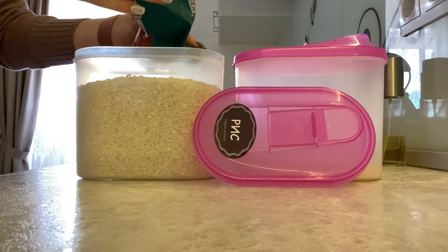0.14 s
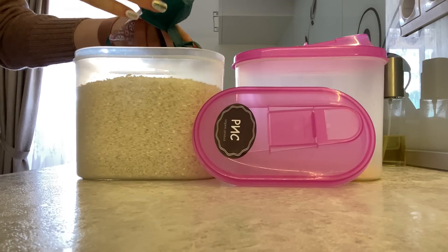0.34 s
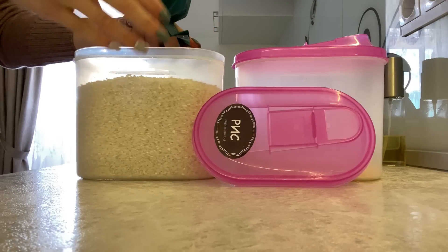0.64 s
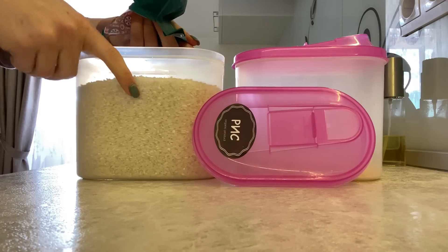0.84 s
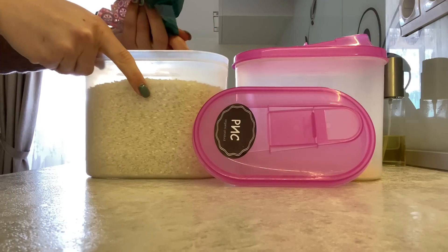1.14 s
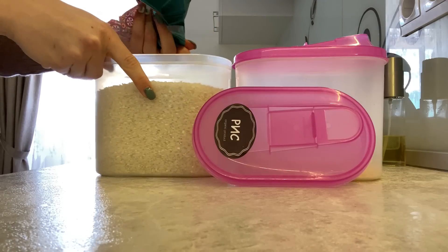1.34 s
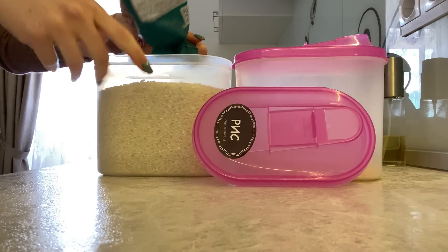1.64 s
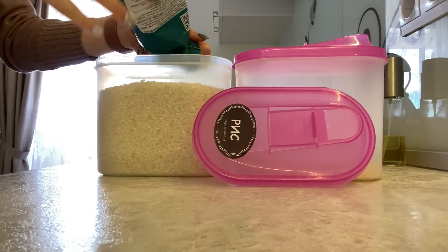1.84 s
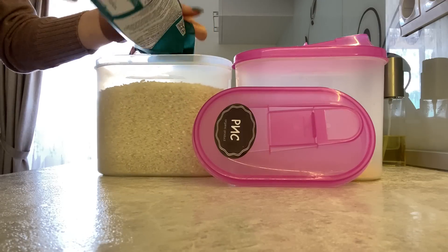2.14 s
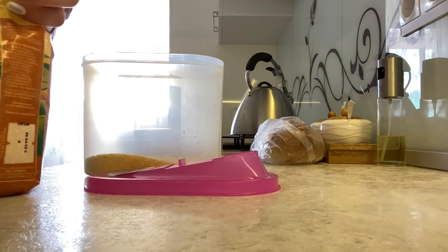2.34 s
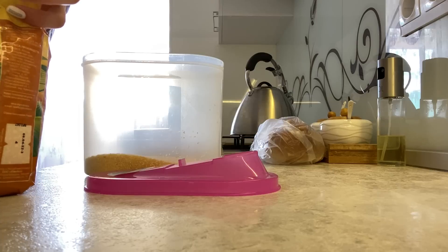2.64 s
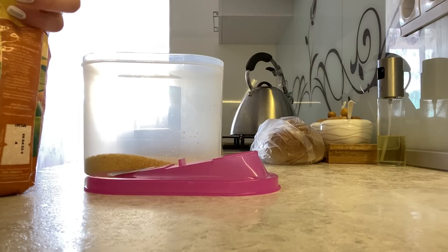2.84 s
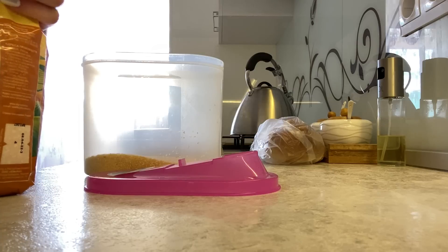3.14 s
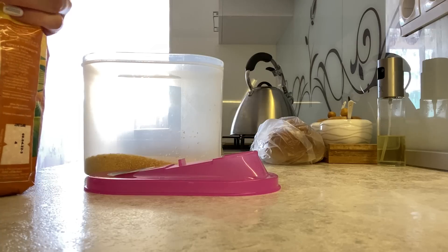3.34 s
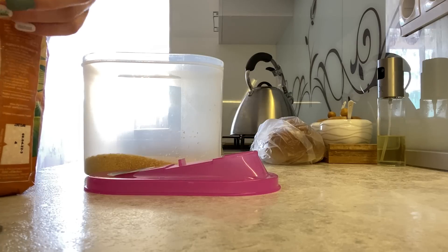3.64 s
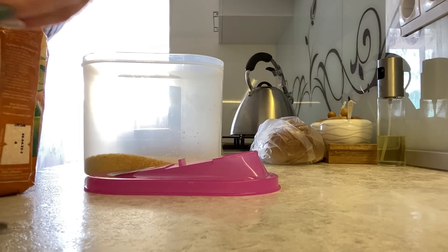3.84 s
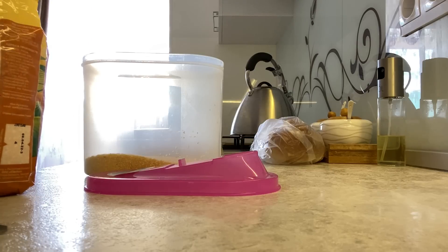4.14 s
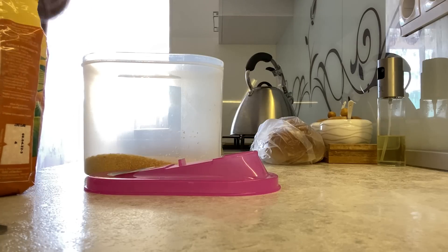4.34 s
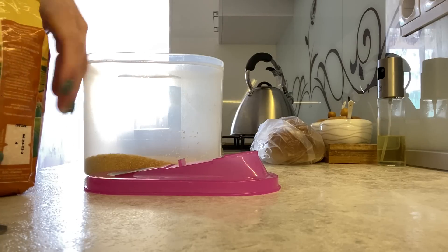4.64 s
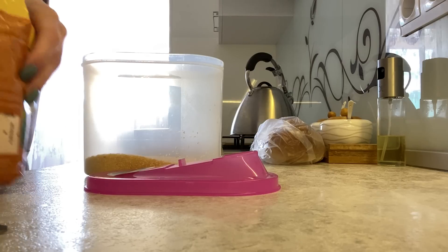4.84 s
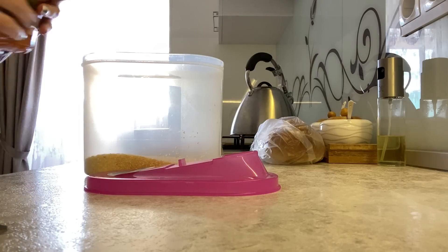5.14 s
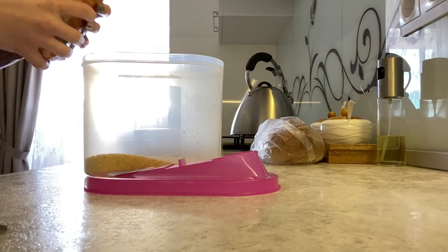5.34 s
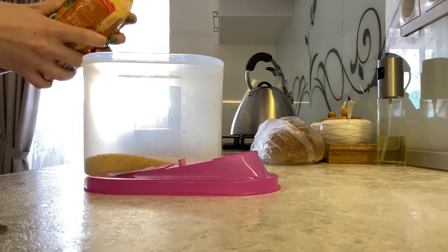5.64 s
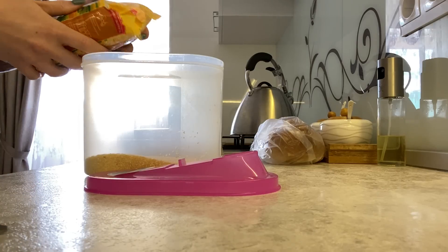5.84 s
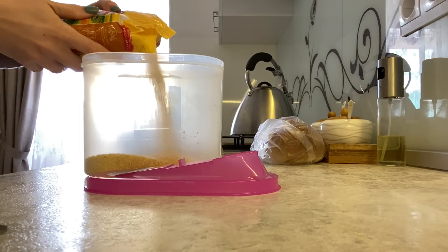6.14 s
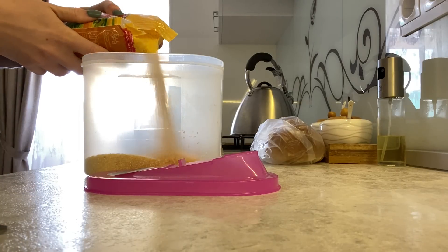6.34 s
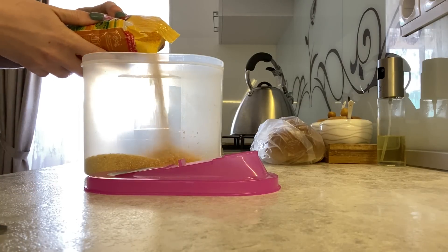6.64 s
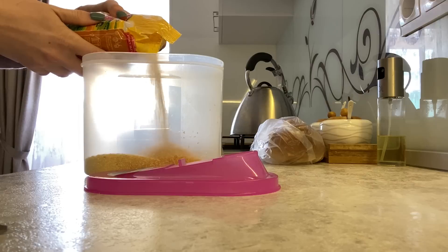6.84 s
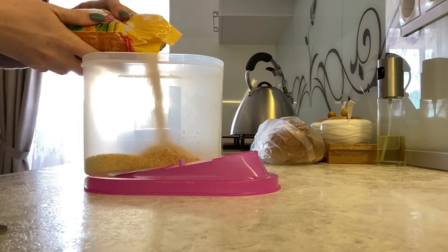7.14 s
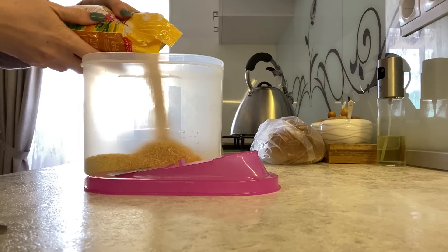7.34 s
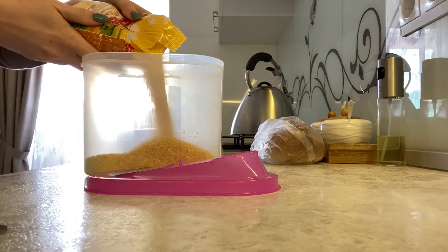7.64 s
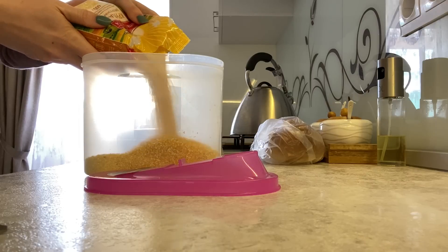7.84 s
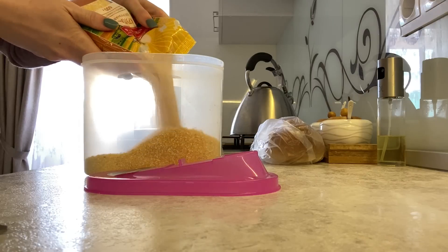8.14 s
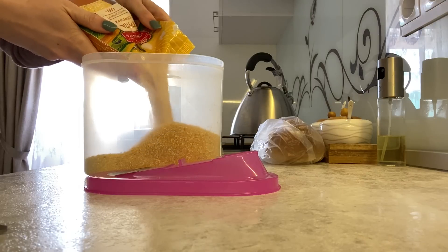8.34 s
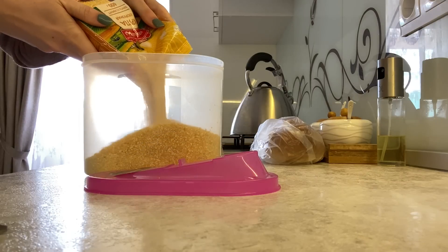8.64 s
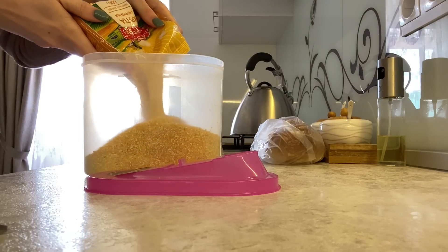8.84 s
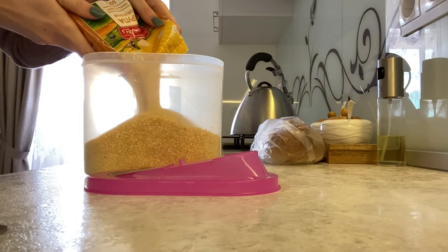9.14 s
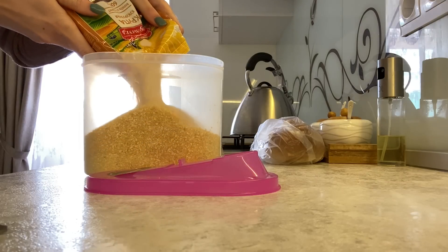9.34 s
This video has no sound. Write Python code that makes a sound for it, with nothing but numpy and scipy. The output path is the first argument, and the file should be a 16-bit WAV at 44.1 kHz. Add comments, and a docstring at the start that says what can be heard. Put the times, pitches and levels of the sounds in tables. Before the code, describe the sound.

Close on a kitchen counter, a nearly empty plastic bag crackles as it is shaken out. A finger rumbles softly through rice and a nail chirps on the tub. A stiff packet snaps and pops open, bumps down with hollow knocks, and is lifted with lighter crinkles. Fine grain then drums into a plastic tub, growing into a dense hiss in a small, lightly reverberant room.

```python
"""A plastic rice bag is shaken out close by on a kitchen counter, over still air and a faint mains hum.
A finger sweeps through the rice, and its nail makes the tub chirp.
A stiff packet is pulled open with snapping creases and popping glue, knocked down, then lifted.
At last fine grain streams into a plastic tub: many tiny impacts drum on the walls and swell to a hiss.
Creases are bursts of noise sent through resonances; rubbing and air are noise given a colour."""
import sys
import numpy as np
from scipy import signal
from scipy.fft import rfft, irfft
from scipy.io import wavfile

SR = 44100
rng = np.random.default_rng(int(sys.argv[2]) if len(sys.argv) > 2 else 0)


def digitize_waveform(pressure):
    """Quantize a signal to 16-bit integers and store it at the path in sys.argv[1].

    Rows of a 2-D input are taken as channels; values are limited to [-1, 1].
    """
    field = np.atleast_2d(pressure).T
    bounded = np.clip(field, -1, 1)
    quanta = np.round(bounded * 32767).astype(np.int16)
    wavfile.write(sys.argv[1], SR, quanta)


N = 418068
TIME = np.arange(N) / SR   # seconds

# Level columns in dB are starting points where scene() adds a trim to them.

# Colour of the background noise. Each row: frequency in Hz, relative level in dB.
AIR = [(30, -13), (65, -4.5), (350, -10), (900, -9), (2000, -20.5), (15000, -33.5)]
AIR_DB = -53.5   # before the trim in scene()
EARLY_AIR_DB = -2.5   # the background noise is this much lower before PACKET_TAKEN_S
# Mains hum. Each row: frequency in Hz, level in dB.
HUM = [(99, -55)]

# Creases giving way in the packets; the rows at 1.822 and 2.012 s are the slack bag knocking against the tub,
# played the same way. Each row: start in seconds, panel level in dB, crack level in dB, tick level in dB.
CREASE_SNAPS = [(0.002,-22,-37,-55), (0.049,-24.5,-34,-62), (0.134,-16,-25,-31), (0.17,-15,-31,-44),
                (0.262,-25.5,-39,-58), (0.327,-40,-44,-40), (0.388,-35,-47,-36), (0.419,-36.5,-42,-41),
                (0.5,-29,-39,-58), (0.524,-21.5,-49,-57), (0.538,-21.5,-27.5,-43), (0.632,-43,-40,-29),
                (0.675,-52,-52,-32.5), (0.686,-47,-44,-39), (0.8975,-30.5,-34.5,-29.5),
                (1.822,-17.5,-30,-32.5), (2.012,-17.5,-33.5,-41.5), (2.249,-30,-9.5,-11.5),
                (2.261,-13,-16,-17), (2.294,-17.5,-9,-5), (2.304,-6.5,-11,-10), (2.403,-37,-31,-27.5),
                (2.432,-39,-22.5,-21.5), (2.512,-29,-30,-25), (2.539,-21,-24,-28), (2.558,-18,-22.5,-29),
                (2.598,-22,-23.5,-30), (2.667,-6,-11.5,-9.5), (2.822,-49,-47,-26), (2.85,-44,-28.5,-24.5),
                (2.882,-24,-33,-24.5), (2.9,-15.5,-26.5,-22), (2.939,-20,-18.5,-18.5), (2.96,-26,-22,-17),
                (3.05,-25.5,-33,-29), (3.158,-27,-33,-24.5), (3.3143,-34.5,-42.5,-35), (3.456,-35,-41,-51),
                (3.57,-27.5,-22.5,-16), (3.644,-13.5,-15,-23.5), (3.7981,-9.5,-10,-21),
                (3.896,-1.5,-8.5,-21), (3.9419,-10.5,-20,-27), (4.157,-37.5,-40.5,-36.5),
                (4.2374,-33,-25.5,-30), (4.3383,-30,-30,-18), (4.389,-27,-30,-31.5), (4.409,-41,-32.5,-37),
                (4.8247,-26.5,-38.5,-51.5), (4.877,-35.5,-43,-49), (4.944,-29.5,-56,-60),
                (5.013,-26.5,-38.5,-46), (5.046,-42,-44,-37), (5.052,-22,-31.5,-35), (5.255,-31,-42,-39),
                (5.486,-30.5,-27,-33), (5.528,-21,-31,-38.5), (5.616,-34,-33.5,-58),
                (5.656,-28.5,-38,-40.5), (5.757,-32,-35,-52), (5.869,-26,-47,-39), (6.016,-50,-32,-55),
                (6.073,-30.5,-42,-40.5), (6.287,-31,-44,-44), (6.4219,-21,-28.5,-22.5),
                (7.112,-31.5,-33.5,-39.5), (7.149,-29.5,-29.5,-52), (7.303,-31.5,-42,-48),
                (7.41,-30.5,-34.5,-48), (7.466,-28.5,-31,-39.5), (7.675,-23,-32,-27.5),
                (7.748,-28.5,-50,-48), (8.083,-21,-33.5,-43), (8.184,-25.5,-30.5,-26), (8.362,-20,-32,-31),
                (8.502,-25.5,-33,-34), (8.579,-26.5,-27.5,-31), (8.834,-26,-23,-28), (8.984,-25,-48,-41),
                (9.17,-34.5,-58,-50), (9.271,-22.5,-31,-36), (9.437,-24,-25.5,-22)]
# Resonances of a packet's panels. Each row: frequency in Hz before tension, width in Hz, relative level in dB.
PANEL_MODES = [(360, 37, -5), (546, 93, -3), (810, 500, 0.5), (982, 210, 6), (1233, 600, -2.5)]
BAG_SHAKEN_S, PACKET_TAKEN_S, PACKET_LIFTED_S = 1, 2.2, 4.7   # when each stage ends or begins
# Tension multiplies the panel pitch; the weight of the grain pulls the lifted packet taut.
LIMP_TENSION = 0.91   # the nearly empty rice bag
EMPTY_TENSION = 0.68   # the same bag, emptied and slack
LIFTED_TENSION = 1.09
FOLD_OCTAVES_PER_DB, USUAL_FOLD_DB = 0.007, -16   # bigger folds ring lower
LIMP_TICK_HZ, STIFF_TICK_HZ = 14000, 6390   # thin film shaken loose ticks higher than firmly held film
TICK_HIGH_HZ = 14500
LOOSE_SHIVER, LIFTED_SHIVER = 0.12, 0.21   # a packet hanging in the hands crumples on after each snap
SHIVERING_FOLD_DB = -23   # until the packet is lifted, folds smaller than this shiver less

# The hands squeeze or shift a packet.
# Each row: start in seconds, length in seconds, panel rustle level in dB, crinkle level in dB.
SQUEEZES = [(0,0.059,-26,-42), (.123,0.054,-24.5,-36), (.25,0.11,-38.5,-49), (.49,0.072,-31.5,-38.5),
            (.67,0.058,-54,-47), (1.49,0.034,-46,-54.5), (1.71,0.16,-42,-66), (1.93,0.18,-49.5,-58.5),
            (2.1,0.078,-39,-55), (2.21,.13,-23.5,-35), (2.39,0.07,-25,-29.5), (2.495,0.061,-17,-29),
            (2.625,0.05,-24.5,-30.5), (2.79,0.072,-32.5,-37.5), (2.88,0.091,-22.5,-31.5),
            (3.02,0.18,-38.5,-39), (3.2,0.75,-49.5,-59.5), (3.65,0.22,-37.5,-47), (3.885,0.074,-13,-44),
            (4.38,0.07,-50,-47), (4.69,0.29,-46,-49), (4.765,0.13,-44.5,-44.5), (5.03,0.13,-38,-41),
            (5.22,0.34,-52,-47.5), (5.49,0.41,-46,-47.5)]
SQUEEZE_ATTACK_S, SQUEEZE_RELEASE_S = 0.0016, 0.026
EASE_IN_SHARE = 0.047   # every movement's attack grows by this share of its length
# Colour of rustling panels. Each row: frequency in Hz, relative level in dB.
RUSTLE = [(150, -18), (320, -7), (420, -7), (580, -2), (1050, -6), (1500, -9), (4500, -29)]
# Colour of crinkling film. Each row: frequency in Hz, relative level in dB.
CRINKLE = [(900, -4.5), (2000, 2), (4400, 0), (7000, -0.5), (11500, -10), (16000, -6)]

# A packet is jolted and its grain settles.
# Each row: start in seconds, length in seconds, rumble level in dB.
BUMPS = [(0,0.011,-44.5), (.13,0.019,-46), (3.645,0.022,-36.5), (3.8,0.037,-34.5), (3.89,0.039,-25.5)]
BUMP_ATTACK_S, BUMP_RELEASE_S = 0.0047, 0.066
# The finger sweeps through the rice.
# Each row: start in seconds, length in seconds, rumble level in dB.
SWEEPS = [(1.09,0.2,-34), (1.34,0.064,-36.5)]
SWEEP_ATTACK_S, SWEEP_RELEASE_S = 0.1, 0.055
SWEEP_RUB_DB, SWEEP_HISS_DB = -15, -16.5   # relative to the rumble
# Colour of rumbling grain. Each row: frequency in Hz, relative level in dB.
RUMBLE = [(30, -23), (110, -24), (150, 3.5), (200, 0), (250, -12.5), (450, -9.5)]

# Tones of the air in the open tubs. Each row: frequency in Hz, relative level in dB.
TUB_AIR = [(320, -13), (582, -1), (720, 0), (952, -5), (1072, -4.5), (1270, -5)]
TUB_AIR_WIDTH_HZ = 22

# A fingernail grazes the tub. Each row: start in seconds, level in dB.
GRAZES = [(1.323,-35), (1.3395,-26.5)]
# Resonances of the wall under the nail. Each row: frequency in Hz, width in Hz, relative level in dB.
WALL_MODES = [(746, 740, 7.5), (3520, 370, 7.5), (6650, 1900, -4)]

# The glued seam of the stiff packet pops open. Each row: start in seconds, level in dB.
SEAM_POPS = [(2.243,-25.5), (2.407,-23), (2.424,-22.5), (2.549,-19), (2.6392,-23)]
SEAM_HZ = 7400   # typical pitch

# The full packet bumps down and sets the tubs ringing. Each row: start in seconds, level in dB.
KNOCKS = [(3.644,-13.5), (3.675,-14.5), (3.799,-8.5), (3.897,-3), (3.943,-14), (3.971,-12.5)]
KNOCK_WIDTH_HZ = 28.4   # for the third tub tone; higher tones are wider

# Fingers slide along the film. Each row: start in seconds, length in seconds, level in dB.
SLIDES = [(4.765,0.011,-39), (5.11,0.096,-41.5)]
SLIDE_HZ, SLIDE_WIDTH_HZ = 6200, 4800   # each of two resonances in a row

# The stream of grain. Each row: time in seconds, drumming level in dB, hiss level in dB.
POUR = [(5.65, -41.5, -50), (5.91, -50, -37.5), (6.1, -44.5, -44), (6.34, -39, -46.5), (6.76, -45, -55),
        (7.06, -44.5, -51.5), (7.589, -39.5, -40.5), (8.13, -36, -36.5), (9.17, -35.5, -34.5),
        (9.48, -36, -34.5)]
POUR_ONSET_S = 0.042   # fade-in that ends at the first row
# Resonances of tub and packet under the stream.
# Each row: frequency in Hz, width in Hz, relative level in dB.
TUB_MODES = [(345.4, 38, -0.5), (563, 75, 4.5), (696, 130, 2), (965, 260, 3), (1210, 570, -4.5)]
# Colour of the streaming hiss. Each row: frequency in Hz, relative level in dB.
HISS = [(900,-6), (1800,9), (2900,1.5), (3500,5.5), (5000,4), (7500,4.5), (9700,2), (13000,4), (14500,-1.5)]

# Kitchen reverberation. Each row: frequency in Hz, time to fall by 60 dB in seconds.
KITCHEN = [(500, 0.31), (3000, 0.41), (14000, 0.13)]
WALL_DULLING_HZ = 7500   # the late echoes weaken around and above this
CUTOFF_HZ = 15900


def from_db(db):
    """Turn decibels into a gain."""
    return 10 ** (np.asarray(db) / 20)


def rms_one(x):
    """Scale a sound to an average strength (rms) of 1."""
    return x / np.sqrt(np.mean(x ** 2) + 1e-20)


def at_level(x, db):
    """Scale a short sound to its rms over the first 15 ms."""
    return x * from_db(db) / np.sqrt(np.mean(x[:int(.015 * SR)] ** 2))


def colour(x, points):
    """Shape the spectrum of x along the points, falling away beyond both ends; rms 1."""
    hz, db = np.transpose(points)
    f = np.maximum(np.arange(N // 2 + 1) * SR / N, 1)
    skirts = 1 / (1 + (hz[0] / f / 2) ** 4) / (1 + (f / hz[-1] / 2) ** 4)
    gain = skirts * from_db(np.interp(np.log(f), np.log(hz), db))
    return rms_one(irfft(rfft(x) * gain, N))


def drift(rate):
    """Slow random wandering with rms 1, taking a new direction this many times a second."""
    knots = rng.standard_normal(int(N / SR * rate) + 2)
    return rms_one(np.interp(TIME * rate, np.arange(len(knots)), knots))


def band(x, low_hz, high_hz):
    """Keep what lies between two frequencies."""
    edges = [low_hz, min(high_hz, .45 * SR)]
    return signal.sosfilt(signal.butter(2, edges, "band", fs=SR, output="sos"), x)


def resonate(x, hz, width):
    """Ring at one pitch, with gain 1 at the peak; a narrow width in Hz rings longer."""
    r = np.exp(-np.pi * width / SR)
    feed = np.array([1, 0, -1]) * (1 - r * r) / 2
    return signal.lfilter(feed, [1, -2 * r * np.cos(2 * np.pi * hz / SR), r * r], x)


def grains(per_s, spread_db):
    """Tiny impacts of uneven size at random moments; rms 1."""
    sizes = from_db(spread_db * np.minimum(rng.exponential(1, N), 4)) * rng.choice([-1, 1], N)
    struck = rng.random(N) < per_s / SR
    # a changing rate keeps a steady power
    return rms_one(sizes * struck / np.sqrt(per_s))


def pings(per_s, low_hz, high_hz, cycles):
    """Random tiny impacts, each ringing briefly at one of twelve pitches; rms 1."""
    pitches = np.geomspace(low_hz, high_hz, 12)
    clicks = grains(per_s, spread_db=3)
    dealt = rng.integers(0, len(pitches), N)
    return rms_one(sum(resonate(clicks * (dealt == k) + 1e-18, hz, hz / cycles) / np.sqrt(hz)
                       for k, hz in enumerate(pitches)))


def stroke(start, length, attack_s, release_s):
    """One movement of the hand: it builds up, holds, then dies away."""
    t = TIME - start
    rise = np.clip(t / (attack_s + EASE_IN_SHARE * length), 0, 1)
    return rise * np.exp(-np.clip((t - length) / release_s, 0, 20))


def strokes(rows, attack_s, release_s):
    """A run of movements, added as power: one gain per sample for each dB column."""
    power = sum(np.outer(from_db(db), stroke(start, length, attack_s, release_s)) ** 2
                for start, length, *db in rows)
    return np.sqrt(power)


def background(air_db):
    """Still room air is coloured noise; the hum is a tone that wavers slightly in phase and level."""
    hum = sum(from_db(db) * np.sqrt(2) * np.sin(2 * np.pi * hz * TIME + .5 * drift(23.0)) for hz, db in HUM)
    air_level = from_db(AIR_DB + air_db + EARLY_AIR_DB * (TIME < PACKET_TAKEN_S))
    return hum * from_db(1.2 * drift(16)) + air_level * colour(rng.standard_normal(N), AIR)


def buckle(t, slip_s, after, after_s):
    """Force of one crease giving way: a quick slip, then a weaker, ragged shiver."""
    onset = 1 - np.exp(-t / 0.00034)
    ragged_db = np.interp(t, np.linspace(0, t[-1], 40), rng.uniform(-9, 9, 40))
    shiver = after * rms_one(from_db(ragged_db)) * np.exp(-t / after_s)
    return rng.standard_normal(len(t)) * onset * (np.exp(-t / slip_s) + shiver)


def facet(force, low_hz, high_hz, ring_hz):
    """A small stiff patch of film: a broad crack, tinted by one damped ring."""
    hz = min(ring_hz * np.exp(.05 * rng.normal()), high_hz)
    return band(force + 2.4 * resonate(force, hz, hz / 2.5), low_hz, high_hz)


def held_tension(s):
    """How taut the film in hand is at time s; tighter film rings higher."""
    if s < BAG_SHAKEN_S:
        return LIMP_TENSION
    if s < PACKET_TAKEN_S:
        return EMPTY_TENSION
    return LIFTED_TENSION if s > PACKET_LIFTED_S else 1


def snaps(panel_db, crack_db, tick_db):
    """Each crease ticks, cracks and sets the panels ringing, the higher the tauter they are."""
    t = np.arange(int(.1 * SR)) / SR
    out = np.zeros(N + len(t))
    for s, panel, crack, tick in CREASE_SNAPS:
        # a big fold runs along the packet and takes longer to give way
        run = 1 + 10 * from_db(panel)
        loose_shiver = LOOSE_SHIVER * min(1, from_db(panel - SHIVERING_FOLD_DB))
        shiver = LIFTED_SHIVER if s > PACKET_LIFTED_S else loose_shiver
        push = buckle(t, slip_s=0.00082 * run, after=shiver, after_s=0.012)
        # the panel flips over
        push[round(.0007 * SR)] += 0.67 * np.linalg.norm(push) / np.sqrt(run)
        slip = buckle(t, slip_s=0.00049 * run, after=shiver / 2, after_s=0.019)

        tension = held_tension(s) * 2 ** (FOLD_OCTAVES_PER_DB * (USUAL_FOLD_DB - panel))
        ring = sum(from_db(db + 2.5 * rng.normal()) * resonate(push, hz * tension, width)
                   for hz, width, db in PANEL_MODES)
        snap = at_level(band(ring, 190, 1500 * tension), panel + panel_db)
        snap += at_level(facet(slip, 1200, 3900, ring_hz=2450), crack + crack_db)
        tick_hz = LIMP_TICK_HZ if s < BAG_SHAKEN_S else STIFF_TICK_HZ
        snap += at_level(facet(slip, 6300, TICK_HIGH_HZ, tick_hz), tick + tick_db)
        start = max(int(s * SR), 0)
        out[start:start + len(t)] += snap[:len(out) - start]
    return out[:N]


def handling(rustle_db, crinkle_db):
    """Swarms of small creases shake the panels and crackle in clumps, over the rub of the fingers."""
    rustle, crinkle = strokes(SQUEEZES, SQUEEZE_ATTACK_S, SQUEEZE_RELEASE_S)
    creases = rms_one(grains(per_s=400, spread_db=3.5) * from_db(4 * drift(70)))
    # each crease is a tiny burst of noise; its power decays with a 0.4 ms time constant
    flutter = signal.lfilter([1], [1, -np.exp(-1 / (.0004 * SR))], creases ** 2)
    creases = rms_one(np.sqrt(flutter + 1e-18) * rng.standard_normal(N))
    rubbing = grains(per_s=12000, spread_db=-1.5)
    panels = colour(creases + 0.4 * rubbing, RUSTLE)

    facets = pings(per_s=450, low_hz=1500, high_hz=14000, cycles=4)
    crackle = .8 * creases + 1.3 * np.diff(facets, prepend=0)
    # a light touch partly slides over the film, a firm grip only creases it
    grip = (crinkle / crinkle.max()) ** .12
    film = grip * colour(crackle, CRINKLE) + np.sqrt(1 - grip ** 2) * colour(rubbing, CRINKLE)
    return from_db(rustle_db) * rustle * panels + from_db(crinkle_db) * crinkle * film


def shifting_grain(stir_db, bump_db):
    """Packed grain slips in many small steps and rumbles in the counter; stirred grains also rub and hiss."""
    sweep = from_db(stir_db) * strokes(SWEEPS, SWEEP_ATTACK_S, SWEEP_RELEASE_S)[0]
    bump = from_db(bump_db) * strokes(BUMPS, BUMP_ATTACK_S, BUMP_RELEASE_S)[0]
    slips = grains(per_s=2000, spread_db=1.5)
    rub = from_db(SWEEP_RUB_DB) * colour(slips, RUSTLE)
    hiss = from_db(SWEEP_HISS_DB) * colour(slips, CRINKLE)
    return (sweep + bump) * colour(slips, RUMBLE) + sweep * (rub + hiss)


def tub_air(x, ring_db):
    """The hollow tubs on the counter answer the sound x in a few steady tones."""
    return sum(from_db(ring_db + db) * resonate(x, hz, TUB_AIR_WIDTH_HZ) for hz, db in TUB_AIR)


def fingernail(scrape_s):
    """The nail skids softly over the wall of the tub and makes it chirp."""
    touch = sum(from_db(db) * stroke(s, 0, .001, scrape_s) for s, db in GRAZES)
    scrape = rng.standard_normal(N)
    chirp = sum(from_db(db) * resonate(scrape, hz, width) for hz, width, db in WALL_MODES)
    return touch * rms_one(chirp)


def seam():
    """Each thread of glue lets go at once and leaves a thin, high ping."""
    out = np.zeros(N)
    t = np.arange(int(.02 * SR)) / SR
    for s, db in SEAM_POPS:
        hz = SEAM_HZ * np.exp(.12 * rng.normal())
        ping = resonate(buckle(t, slip_s=.0005, after=.03, after_s=.004), hz, hz / 4)
        start = int(s * SR)
        out[start:start + len(t)] += at_level(band(ping, hz / 2, hz * 2), db)
    return out


def knocks():
    """Each bump strikes all the tones of the tubs at once, each with a strength of its own."""
    out = np.zeros(N)
    t = np.arange(int(.2 * SR)) / SR
    for s, level in KNOCKS:
        ring = 0
        for hz, db in TUB_AIR:
            strength = from_db(db + 2 * rng.normal()) * rng.choice([-1, 1])
            # higher tones die sooner
            width = KNOCK_WIDTH_HZ * np.sqrt(hz / TUB_AIR[2][0])
            ring = ring + strength * np.sin(2 * np.pi * hz * t) * np.exp(-np.pi * width * t)
        start = int(s * SR)
        out[start:start + len(t)] += at_level(ring, level)
    return out


def sliding():
    """Skin slipping over film gives a smooth swish: noise through two equal resonances."""
    swish = resonate(rng.standard_normal(N), SLIDE_HZ, SLIDE_WIDTH_HZ)
    swish = resonate(swish, SLIDE_HZ, SLIDE_WIDTH_HZ)
    return strokes(SLIDES, SQUEEZE_ATTACK_S, SQUEEZE_RELEASE_S)[0] * rms_one(swish)


def pour(drum_db, hiss_db, impacts_per_s):
    """Grains patter on the heap and drum on the walls; a thicker stream is denser and smoother."""
    s, *levels = np.transpose(POUR)
    flowing = np.clip(1 + (TIME - s[0]) / POUR_ONSET_S, 0, 1)
    drum, hiss = [flowing * from_db(np.interp(TIME, s, db)) for db in levels]
    impacts = grains(impacts_per_s * (.15 + hiss / hiss.max()), spread_db=0.5)
    # about forty faint, uneven ticks a second roughen the stream
    ticks = grains(per_s=40, spread_db=2.5)
    blows = impacts + 0.38 * ticks

    # the stream wanders over the heap and favours now one resonance, now another
    walls = sum((-1) ** k * from_db(db + 2 * drift(20)) * resonate(blows, hz, width)
                for k, (hz, width, db) in enumerate(TUB_MODES))
    tub = rms_one(band(walls, 133, 1680)) + from_db(-19.5) * colour(blows, RUMBLE)
    # single grains ping off the wall
    patter = pings(per_s=500, low_hz=2000, high_hz=13000, cycles=5)
    stream = colour(impacts + 0.077 * ticks + 0.34 * patter, HISS)
    # the stream leaves the packet unevenly
    surge = from_db(.6 * drift(9) + .6 * drift(60))
    return surge * (from_db(drum_db) * drum * tub + from_db(hiss_db) * hiss * stream)


def kitchen(x, early_db, late_db):
    """Quick reflections from counter and tubs, then a diffuse tail that dies first in the treble."""
    t = np.arange(int(.5 * SR)) / SR
    hz, t60 = np.transpose(KITCHEN)
    edges = np.geomspace(100, 19000, 9)
    tail = 0
    for low, high in zip(edges, edges[1:]):
        decay_s = np.interp(np.log(low * high) / 2, np.log(hz), t60)
        noise = band(rng.standard_normal(len(t)), low, high)
        tail = tail + noise * from_db(-60 * t / decay_s) / np.hypot(1, low / WALL_DULLING_HZ)
    tail = tail * np.clip(t / 0.0063, 0, 1)
    early = rng.standard_normal(len(t)) * (t > .002) * np.exp(-t / 0.0037)
    early = band(early, 160, 8400)
    response = from_db(early_db) * early / np.linalg.norm(early)
    response += from_db(late_db) * tail / np.linalg.norm(tail)
    return signal.fftconvolve(x, response)[:N]


def scene():
    """Add up the packets, the grain and the tubs, then the kitchen around them."""
    packets = snaps(panel_db=-0.1, crack_db=-1.26, tick_db=1.26)
    packets = packets + handling(rustle_db=-1.5, crinkle_db=1.4) + seam() + sliding()
    grain = shifting_grain(stir_db=-4.5, bump_db=7.5)
    grain = grain + pour(drum_db=1.0, hiss_db=3.0, impacts_per_s=8100)
    tubs = tub_air(packets, ring_db=-0.5) + knocks() + fingernail(scrape_s=0.0095)
    near = packets + grain + tubs
    return (near + kitchen(near, early_db=-15.5, late_db=-18.0) + background(air_db=1.5))[None]


def record(dry):
    """The loudest peaks are squashed; the deepest bass and the top are cut."""
    top = .68   # no peak passes this before the filters
    squashed = dry / (1 + (dry / top) ** 4) ** .25
    thinned = signal.sosfilt(signal.butter(2, 40, "high", fs=SR, output="sos"), squashed)
    return signal.sosfilt(signal.ellip(12, .2, 80, CUTOFF_HZ, fs=SR, output="sos"), thinned)


dry = scene()
out = record(dry)
digitize_waveform(out)
```